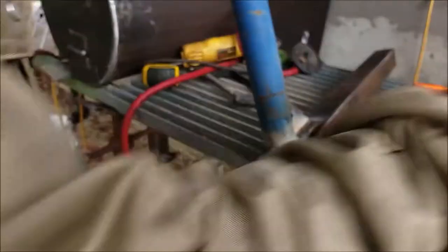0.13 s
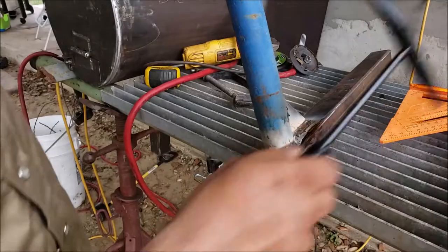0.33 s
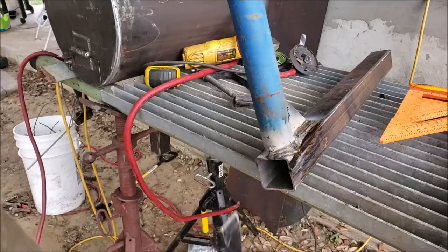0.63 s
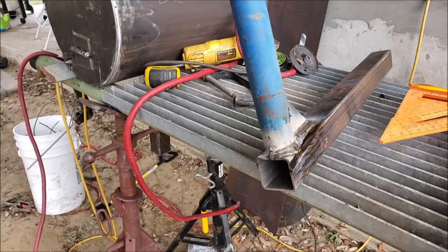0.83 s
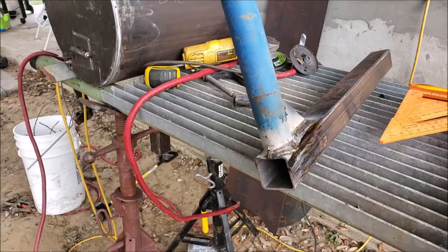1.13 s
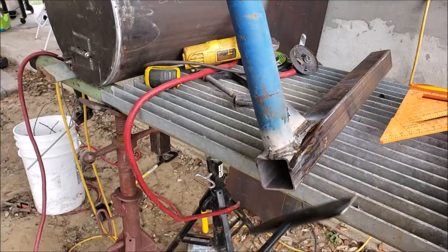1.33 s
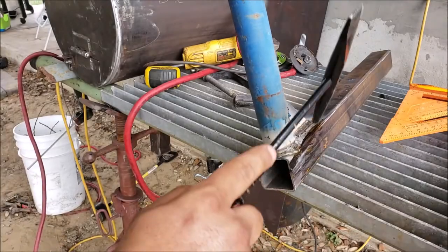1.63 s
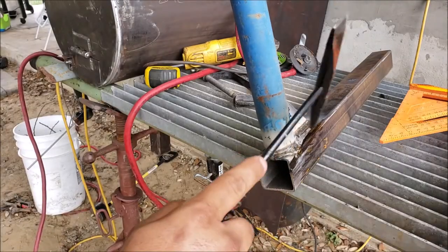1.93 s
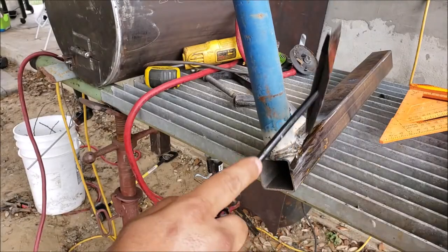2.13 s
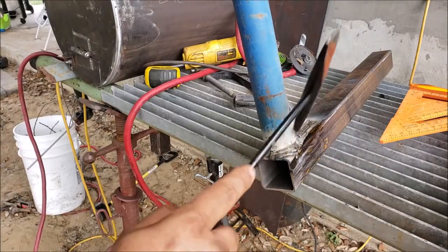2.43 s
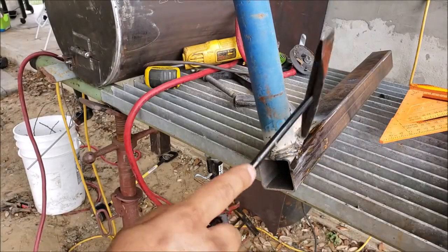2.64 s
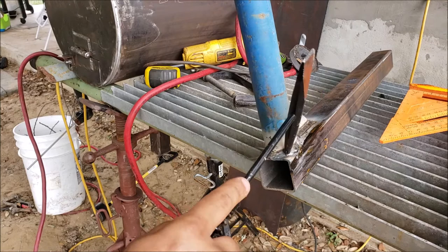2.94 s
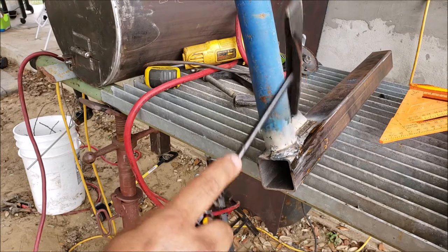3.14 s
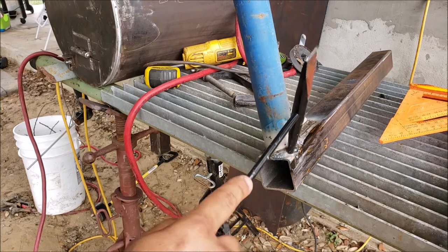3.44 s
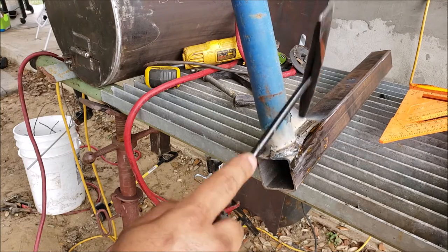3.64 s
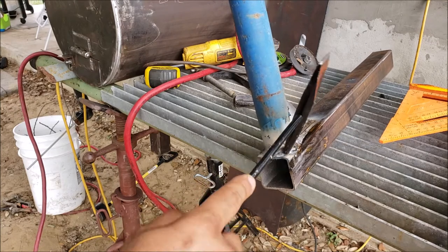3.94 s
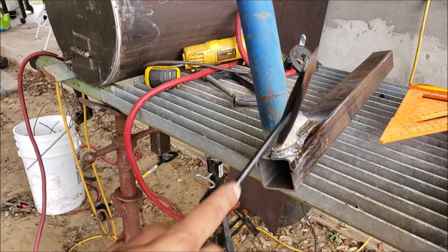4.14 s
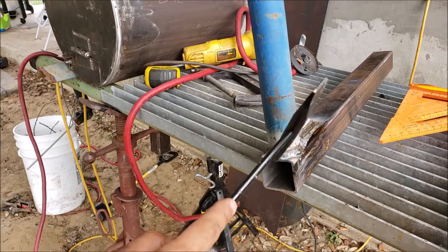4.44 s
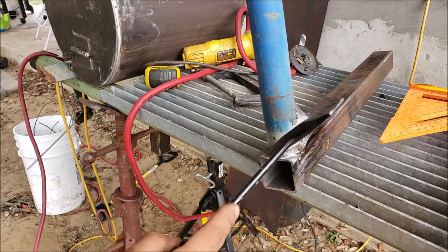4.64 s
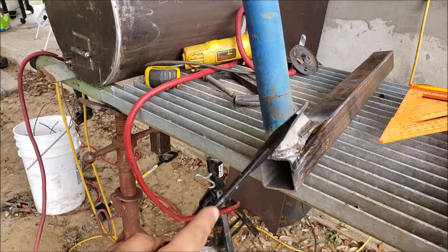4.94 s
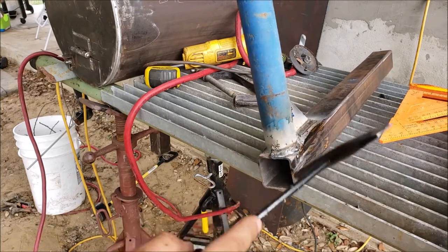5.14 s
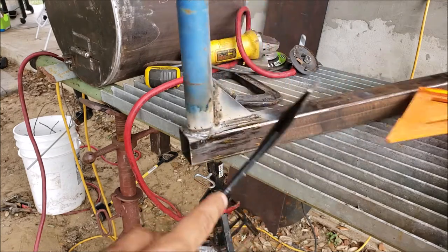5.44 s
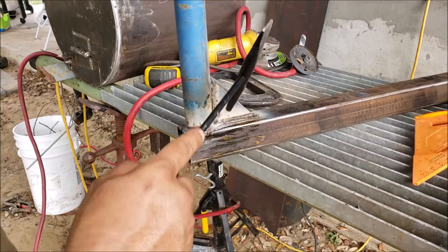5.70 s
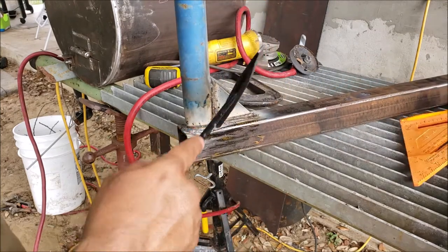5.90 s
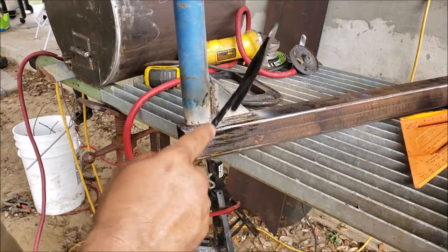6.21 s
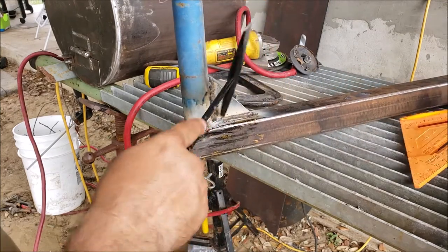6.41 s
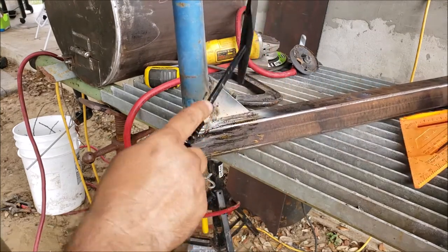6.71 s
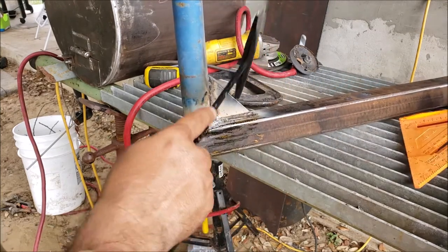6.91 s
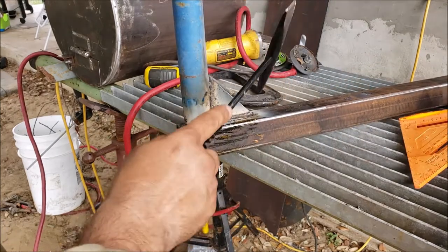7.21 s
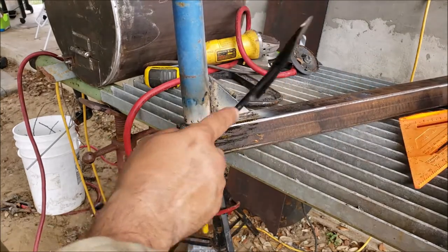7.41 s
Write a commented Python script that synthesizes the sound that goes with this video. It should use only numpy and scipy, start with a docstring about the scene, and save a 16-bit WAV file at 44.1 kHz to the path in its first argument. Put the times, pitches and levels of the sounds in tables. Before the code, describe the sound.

A low engine hum with rumble and light hiss runs in the background throughout, slowly getting quieter. A sleeve swishes faintly at about 0.2 seconds. At 1.8 seconds a chipping hammer starts knocking slag off a weld on square steel tubing, close by. It strikes fourteen times in an even rhythm, about four blows a second, until around 4.9 seconds. Each blow is a hollow knock with a bright, quickly fading metallic ring and a few tiny ticks of flying slag, varying a little in force and tone. At about 5.3 seconds the piece is dragged over a steel grating in one short scrape, landing with a ringing clatter near 5.5 seconds and rocking lightly. The hammering resumes at 5.9 seconds at the same pace, with a slightly different ring, for eight more blows, the last at about 7.6 seconds.

```python
"""On a steel grating, a chipping hammer knocks slag (the crust on a weld) off square steel tubing.
Each blow gives a hollow knock, a bright ring from the tube and a few ticks of flying slag.
Midway the piece is dragged round and set down with a clatter, and the chipping goes on.
A sleeve swishes at the start, an engine hums in the background, and a limiter flattens the hardest blows.
"""
import sys
import numpy as np
from scipy import signal
from scipy.io import wavfile
from scipy.ndimage import uniform_filter1d, minimum_filter1d

SR = 44100
rng = np.random.default_rng(int(sys.argv[2]) if len(sys.argv) > 2 else 0)


def waveform_to_disk(signal):
    """Save audio, clipped to [-1, 1], as 16-bit WAV at the path in sys.argv[1]."""
    frames = np.transpose(np.atleast_2d(signal))
    scaled = np.clip(frames, -1, 1) * 32767
    samples = np.round(scaled).astype(np.int16)
    wavfile.write(sys.argv[1], SR, samples)


N = 333396
TIME = np.arange(N) / SR
AGE = np.arange(int(0.9 * SR)) / SR  # seconds since a hit

# A hit has four strengths, low to high: knock, ring, shimmer, crack. Levels in the tables are relative.
# where they apply: knock_end_hz, ring_start_hz, ring_end_hz, shimmer_start_hz, shimmer_end_hz, crack_hz
RANGES_HZ = [2200, 2900, 4400, 5400, 7500, 9500]
# hammer blows, about four a second; the tone that swings most where the hammer lands is boosted,
# one that is still there is cut: start_s, place, force_db, brightness_db, tone_hz, boost_db
BLOWS = [(1.8094, 0, -25, 12, 4460, 2), (2.056, 0, -26, -0.5, 2830, -9), (2.289, 0, -24, 0, 6760, 10.5),
         (2.5243, 0, -29.5, -1.1, 2890, -7), (2.755, 0, -29.5, -1, 7210, 13),
         (2.9862, 0, -25, 0.1, 3000, 11), (3.236, 0, -25.5, -1.5, 4100, 4),
         (3.4634, 0, -30.5, 4, 3965, 13.5), (3.705, 0, -29, -2.5, 3700, 7),
         (3.9429, 0, -29.5, -0.1, 3170, 9), (4.1761, 1, -31, 1.7, 4410, 10.5),
         (4.405, 1, -28, 3.5, 4410, 11), (4.6436, 1, -23.5, -1, 2780, 2),
         (4.8956, 0, -32.5, -0.5, 6100, 13), (5.865, 2, -26.5, -2, 2930, -6),
         (6.1138, 3, -25, 6.5, 5900, 5.5), (6.3663, 2, -27, 2.5, 3730, 8.5),
         (6.6001, 2, -27, -.8, 3100, 4.5), (6.8379, 2, -24.5, 0.9, 6000, 10.5),
         (7.0761, 3, -24.7, -5.5, 3550, 6), (7.3134, 3, -26.7, 1.3, 4410, 5.5),
         (7.5541, 3, -25.5, -1, 3300, 7)]
# light grazes just before a blow or as the hammer skids off: start_s, place, force_db
GRAZES = [(1.838, 3, -37), (4.17, 1, -48), (4.396, 1, -46), (4.888, 1, -43)]
# places the hammer hits, each using one row of SPOTS: spot, knock_db, ring_db, shimmer_db, crack_db
PLACES = [(0, 7.5, 3, -3, -10), (0, 6, 5.5, -3.5, -11), (1, 7, 1.6, -1.6, -10.5), (2, 1, 4, 1.5, -10.5)]
# change for each dB of brightness: knock_db, ring_db, shimmer_db, crack_db
BRIGHTNESS_TILT = [-.5, -.5, .5, .5]
# how three spots on the tube answer a hit: spread_s, tube_db, wash_db
SPOTS = [(.002, 2.5, -0.5), (.003, 0, -2), (.012, 7, 3)]
# ringing tones of the tube (fade_s is the time to fall 60 dB): pitch_hz, fade_s, spot0_db, spot1_db, spot2_db
TUBE_TONES = [(1523, 0.31, -18, -28, -15), (1992, 0.45, -22, -27, -19), (2048, 0.32, -11, -21, -18),
              (2140, 0.31, -18, -17, -10), (2754, 0.29, -9, -23, -22), (2902, 0.48, -21, -15, -21),
              (3141, 0.5, -7, -12, -16), (3157, 0.54, -15, -17, -22), (3233, 0.34, -11, -5, -9),
              (3305, 0.27, -16, -12, -14), (3677, 0.18, -5, 5, 7), (3704, 0.26, -12, -7, -7),
              (3793, 0.29, -5, -14, -17), (3900, 0.35, -11, -15, -14), (4110, 0.28, -8, -11, -16),
              (4250, 0.27, -8, -11, -3), (4296, 0.29, -18, -20, -15), (4409, 0.24, -6, -14, 1),
              (4560, 0.27, -9, -5, -4), (4877, 0.27, -12, -3, -13), (5211, 0.23, -8, -9, -7),
              (5243, 0.27, -7, -8, -5), (5478, 0.23, -9, -11, -3), (5550, 0.29, -10, -8, -3),
              (5652, 0.23, -7, -9, -2), (5817, 0.22, -9, -4, -2), (5962, 0.26, -8, -7, -10),
              (6054, 0.31, -11, -8, -4), (6751, 0.31, -12, -19, -21), (7041, 0.26, -16, -13, -19)]
# short tones of the hollow knock: pitch_hz, fade_s, spot0_db, spot1_db, spot2_db
KNOCK_TONES = [(706, 0.093, -7, -6.5, -7), (778, 0.1, 3.5, -5.5, -20), (956, 0.0094, 10, 4, 0),
               (1539, 0.07, 3, 6, 6), (2060, 0.0078, 4.5, 9, 5), (1997, 0.042, 9.5, 13, 8),
               (2264, 0.0089, 16, 11, 9), (2870, 0.069, 3.5, -1.5, -2), (3150, 0.1, 4.5, -1.5, 8),
               (3936, 0.14, -5.5, -10, -18), (4410, 0.081, 1, -9, -7)]
# drive of the upper knock tones above the ring strength: spot0_db, spot1_db, spot2_db
UPPER_KNOCK_DB = [6.5, 8, 0]
# the hammer's own long ring: pitch_hz, fade_s, spot0_db, spot1_db, spot2_db
HAMMER_TONES = [(908, 0.84, -27, -51, -38), (2095, 0.45, -38.5, -14.5, -14), (3187, 0.97, -16.5, -24, -15)]
# tones of the grating: pitch_hz, fade_s, level_db
GRATING_TONES = [(311, 0.23, -22), (410, 0.091, -10), (725.5, 0.14, 2), (766.7, 0.14, 6), (920, 0.034, -16),
                 (1210, .14, -1.5), (1980, 1, -21.5), (2402, 0.12, 0), (2620, 0.19, -24)]
# how much of a knock passes into the grating: spot0_db, spot1_db, spot2_db
GRATING_SHARE_DB = [-17, -13, -13]
# countless weak tones and echoes that blur into a wash of noise: pitch_hz, level_db, fade_s
WASH = [(204, -20, 0.25), (448, -5.5, 0.21), (820, -7.5, 0.27), (1160, -18.5, 0.5), (1740, -6, 0.4),
        (3300, 0.5, 0.3), (3700, 6.5, 0.27), (7080, 6, 0.23), (8200, -15, 0.11), (11900, 12.5, 0.29),
        (15300, -31.5, 0.15)]
# first crack of steel on slag: pitch_hz, level_db, fade_s
CRACK = [(300, -7, 0.053), (1000, -6.5, 0.049), (2210, 1, 0.019), (4150, 2, 0.12), (8370, 4.5, 0.0056),
         (14900, 4.5, 0.088)]
# how alike the steel sounds on the left and right: pitch_hz, likeness
RING_LIKENESS = [(200, 1), (800, 0.27), (1500, -0.48), (2500, -0.13), (5000, -0.29), (14000, 0.22)]
# which side the steel is louder on: pitch_hz, left_minus_right_db
RING_PAN = [(300, 9.5), (700, -4.5), (1400, -1.5), (2800, 3), (5000, -0.5), (9000, -2.5), (14000, -2.5)]
# an edge touches the grating as the piece is lifted, lowered and rocks: start_s, force_db, thud_db
TOUCHES = [(5.2745, -47.5, 5.5), (5.4415, -33, 7.5), (5.5583, -32.5, -5.5), (5.617, -42.5, 6.5),
           (5.763, -53.5, 6)]
# tone colour of the scrape: pitch_hz, level_db
DRAG_COLOUR = [(120, -44), (200, -16), (390, -3), (494, -7.5), (849, -11.5), (1020, -15), (2090, -5.5),
               (2650, -11.5), (3730, -6), (7020, -23.5), (15000, -31)]
# a sleeve brushes past: time_s, level_db, pitch_hz
SLEEVE = [(.1, -85, 4500), (.2, -51, 4310), (0.291, -50, 3420), (.38, -85, 3200)]
# tones of the engine: multiple_of_shaft_rate, level_db
ENGINE_TONES = [(2, -0.5), (3, -13.5), (4, -13), (5, -22), (6, -19.5), (7, -34), (8, -26), (9, -26),
                (10, -34), (11, -32.5), (12, -33.5), (13, -46)]
# loudness of the engine and background noise together: time_s, level_db
BACKGROUND_LEVEL = [(0.15, -29), (1.38, -29), (1.66, -27.5), (2.32, -31), (6.07, -31.5), (6.15, -33.5),
                    (6.19, -34.5), (7.5, -37)]
# tone colour of the background noise: pitch_hz, level_db
AIR_COLOUR = [(15, -37), (25, -12), (70, -0.5), (223, -19), (270, -27.5), (326, -34), (575, -30),
              (863, -30), (1330, -38), (2410, -35.5), (4370, -42), (6380, -39), (8830, -53), (14800, -46.5),
              (16000, -61)]
# how alike that noise is on the left and right: pitch_hz, likeness
AIR_LIKENESS = [(60, 0.15), (150, 0.91), (300, 0.45), (700, 0.16), (2000, 0.036), (10000, 0.026)]


def struck_steel():
    """Hammer blows and drops on the grating both set the welded tube ringing."""
    out = np.zeros((2, N))
    tube, knock = tones(TUBE_TONES), tones(KNOCK_TONES)
    hammer, grating = tones(HAMMER_TONES), tones(GRATING_TONES)
    band_hz, wash = fading_noise(WASH)
    _, crack = fading_noise(CRACK)
    wall_hz, walls = wall_overtones()
    tube_hz, _, *tube_spots = np.transpose(TUBE_TONES)
    knock_hz, _, *knock_spots = np.transpose(KNOCK_TONES)
    _, _, *hammer_spots = np.transpose(HAMMER_TONES)
    _, _, grating_db = np.transpose(GRATING_TONES)

    def ringing(hit, tones_db, wash_db, spread_s):
        """The crack comes at once; the ring swells as the hit spreads through the steel."""
        clear = excite(tube, tones_db + strength(hit, tube_hz))
        clear += excite(walls, strength(hit, wall_hz) - 21, scatter_db=3.5)
        blur = excite(wash, strength(hit, band_hz, focus=0.96) + wash_db, scatter_db=1)
        snap = excite(crack, strength(hit, band_hz) + 2.5)
        swell = 1 - np.exp(-AGE / spread_s)
        ring = swell * (clear + crumble(blur, share=0.66, length_s=0.0033))
        return ring + crumble(snap, share=0.75, length_s=0.0071)

    for start_s, spot, hit in hammer_blows():
        knock_db, ring_db, _, crack_db = hit[:4]
        spread_s, tube_db, wash_db = SPOTS[spot]
        drive_db = np.where(knock_hz < RANGES_HZ[0], knock_db, ring_db + UPPER_KNOCK_DB[spot])
        thud = excite(knock, knock_spots[spot] + drive_db + 1, scatter_db=1)
        head = excite(hammer, hammer_spots[spot] + knock_db)
        bars = excite(grating, grating_db + knock_db + GRATING_SHARE_DB[spot])
        body = ringing(hit, tube_spots[spot] + tube_db, wash_db, spread_s)
        thud = crumble(thud, share=0.3, length_s=0.012)
        chips = from_db(crack_db + 6) * slag_chips()
        add(out, start_s, body + bars + thud + head + chips)
    for start_s, damping_db_per_s, levels_db, thud_db in drops():
        levels_db[0] += thud_db  # the weight of the piece adds to the knock alone
        clang = excite(grating, grating_db + levels_db[0])
        hit = [*levels_db, 0, 0]  # a broad contact boosts no single tone
        body = ringing(hit, np.mean(tube_spots, 0) + 7.5, wash_db=6, spread_s=0.0011)
        add(out, start_s, (body + clang) * from_db(-damping_db_per_s * AGE))
    return out


def hammer_blows():
    """Place, force and brightness set the four strengths of each blow or graze."""
    grazes = [(*graze, 0, 0, 0) for graze in GRAZES]
    for start_s, place, force_db, brightness_db, tone_hz, boost_db in BLOWS + grazes:
        spot, *colour_db = PLACES[place]
        levels_db = force_db + np.array(colour_db) + brightness_db * np.array(BRIGHTNESS_TILT)
        yield start_s, spot, [*levels_db, tone_hz, boost_db]


def strength(hit, hz, focus=1):
    """How hard a hit drives each pitch, in dB, with a boost or cut around one tone."""
    knock, ring, shimmer, crack, tone_hz, boost_db = hit
    broad_db = np.interp(np.log(hz), np.log(RANGES_HZ), [knock, ring, ring, shimmer, shimmer, crack])
    return broad_db + focus * boost_db * np.exp(-(focus * (hz - tone_hz) / 170) ** 2)


def excite(parts, db, scatter_db=1.5):
    """Add up tones or noise bands, each driven a little differently every time."""
    return np.tensordot(from_db(db + scatter_db * rng.standard_normal(len(parts))), parts, 1)


def tones(table, lag_s=0.0002, attack_s=0.00059):
    """Struck steel rings as fading sine waves; shorter waves are more out of step left and right."""
    rings = []
    for hz, fade_s, *_ in table:
        apart = min(np.pi * hz * lag_s, np.pi / 2) * rng.choice([-1, 1])
        phase = rng.uniform(0, 2 * np.pi) + apart * np.array([[.5], [-.5]])
        rings.append(np.sin(2 * np.pi * hz * AGE + phase) * from_db(-60 * AGE / fade_s) * panned(hz))
    return np.array(rings) * (1 - np.exp(-AGE / attack_s))


def wall_overtones(count=110, fade_s=0.25):
    """The thin tube walls have many high tones of uneven strength."""
    pitches_hz = rng.uniform(4500, 15500, count)
    gains = from_db(4 * rng.standard_normal(count))
    return pitches_hz, tones([(hz, fade_s) for hz in pitches_hz]) * gains[:, None, None]


def fading_noise(table):
    """Bands of noise, each dying away at its own rate."""
    band_hz, bands = noise_bands(150, RING_LIKENESS, size=len(AGE), count=24)
    fades = [from_db(db - 60 * AGE / fade_s) * panned(hz)
             for hz, db, fade_s in zip(band_hz, *at_hz(table, band_hz))]
    return band_hz, bands * fades


def crumble(sound, share, length_s):
    """A contact is one clean impact followed by a short spray of tiny ones."""
    age = AGE[:SR // 20]
    spikes = rng.standard_normal(len(age)) ** 3 * np.exp(-age / length_s)
    spray = unit_level(spikes) / np.sqrt(len(age))
    force = share * spray + (age == 0)
    return signal.fftconvolve(sound, force[None] / np.hypot(1, share))[:, :len(AGE)]


def slag_chips(flight_s=0.054, lowest_hz=6000, count=5):
    """A few flakes of slag fly off and tick against the steel."""
    impacts = np.zeros((2, len(AGE)))
    at = np.minimum(rng.exponential(flight_s, count) * SR, len(AGE) - 1).astype(int)
    impacts[:, at] = rng.standard_normal((2, count)) * np.exp(-AGE[at] / (2 * flight_s))
    tick = rng.standard_normal(SR // 200) * np.exp(-AGE[:SR // 200] / .0007)
    ticks = signal.fftconvolve(impacts, tick[None])[:, :len(AGE)]
    return filtered(ticks, lowest_hz, "high")


LANDING_S = 5.4572  # the drag ends and the piece lands flat


def drops(gap_s=0.012, landing_db=-28.6, loss_db=13):
    """The piece chatters as it lands, each bounce weaker and shorter, with light touches around it."""
    landing_colour_db = np.array([-1, 2, -1, -2.5])  # knock, ring, shimmer, crack
    touch_colour_db = np.array([-2, 2.5, 0.5, -6.5])
    # each contact: start_s, damping_db_per_s, levels_db, thud_db
    for bounce in range(3):
        levels_db = landing_db - bounce * loss_db + landing_colour_db
        yield LANDING_S + bounce * gap_s, 90 * bounce, levels_db, 11.5 - 5 * bounce
    for start_s, force_db, thud_db in TOUCHES:
        yield start_s, 548, force_db + touch_colour_db, thud_db


def drag(start_s=5.272, peak_s=5.347, rise_db_per_s=165, fall_db_per_s=162, grit_db=2.5):
    """Steel catches and slips over the grating in one push that swells and dies away."""
    band_hz, bands = noise_bands(200, RING_LIKENESS, size=SR // 2, count=20)
    scrape = np.zeros((2, N))
    add(scrape, 5.2, unit_level(excite(bands, at_hz(DRAG_COLOUR, band_hz))))
    below_peak_db = np.maximum((peak_s - TIME) * rise_db_per_s, (TIME - peak_s) * fall_db_per_s)
    push = from_db(-23 - below_peak_db) * (TIME > start_s) * (TIME < LANDING_S)
    return scrape * push * from_db(grit_db * drift(rate_hz=350))


def sleeve(width_hz=380):
    """A faint swish of cloth that falls in pitch as the arm slows."""
    time_s, level_db, pitch_hz = np.transpose(SLEEVE)
    rustle = filtered(rng.standard_normal((2, N)), width_hz, "low")
    glide = np.sin(2 * np.pi * np.cumsum(np.interp(TIME, time_s, pitch_hz)) / SR)
    loudness = from_db(np.interp(TIME, time_s, level_db)) * (TIME < time_s[-1])
    return unit_level(rustle * glide) * loudness


def engine(shaft_hz=30.6, waver_rad=0.089, flutter=0.28):
    """A hum at multiples of the shaft's turning rate; the firing tone is steady, weaker ones flutter."""
    angle = 2 * np.pi * shaft_hz * TIME + waver_rad * drift(rate_hz=3)
    hum = np.zeros(N)
    for multiple, db in ENGINE_TONES:
        gain = from_db(db) * (1 + flutter * (db < -6) * drift(rate_hz=7))
        hum += gain * np.sin(multiple * angle + rng.uniform(0, 2 * np.pi))
    return from_db(-0.34) * np.sqrt(2) * hum


def air():
    """Deep throb, rumble and hiss that go with the hum."""
    band_hz, bands = noise_bands(20, AIR_LIKENESS, size=N, count=22)
    bands *= from_db(at_hz(AIR_COLOUR, band_hz))[:, None, None]
    throb = unit_level(bands[band_hz < 50].sum(0))
    rumble = unit_level(bands[(band_hz > 85) & (band_hz < 260)].sum(0))
    hiss = unit_level(bands[band_hz >= 260].sum(0))
    return from_db(-21) * throb + from_db(-15) * rumble + from_db(-14) * hiss


def noise_bands(lowest_hz, likeness, size, count):
    """Stereo noise split into bands: their middle pitches and their sounds."""
    edges_hz = np.geomspace(lowest_hz, 17000, count + 1)
    band_hz = np.sqrt(edges_hz[1:] * edges_hz[:-1])
    white = rng.standard_normal((2, 2, size))
    bands = []
    for k, hz in enumerate(band_hz):
        shared, opposite = filtered(white[k % 2], edges_hz[k:k + 2], "band")
        alike = np.clip(at_hz(likeness, hz), -1, 1)
        bands.append(np.sqrt(1 + alike) * shared + np.sqrt(1 - alike) * opposite * [[1], [-1]])
    return band_hz, 2 * np.array(bands)


def filtered(sound, hz, kind):
    """Keep the lows, the highs or one band."""
    return signal.sosfilt(signal.butter(2, hz, kind, fs=SR, output="sos"), sound)


def panned(hz):
    """Left and right gain of the ringing steel at one pitch."""
    return from_db(at_hz(RING_PAN, hz) * np.array([[.5], [-.5]]))


def at_hz(table, hz):
    """Read a table's columns at the given pitch."""
    pitch_hz, *columns = np.transpose(table)
    return np.squeeze([np.interp(np.log(hz), np.log(pitch_hz), column) for column in columns])


def drift(rate_hz):
    """A curve that wanders at random around zero."""
    points = rng.standard_normal(int(N / SR * rate_hz) + 2)
    return np.interp(TIME * rate_hz, np.arange(len(points)), points)


def from_db(db):
    """Turn decibels into a gain."""
    return 10 ** (np.asarray(db) / 20)


def unit_level(sound):
    """Scale a sound to an average power of one."""
    return sound / np.sqrt(np.mean(sound ** 2) + 1e-20)


def add(out, start_s, sound):
    """Mix a sound in at its start time."""
    at = int(start_s * SR)
    out[:, at:at + sound.shape[1]] += sound[:, :max(N - at, 0)]


def scene():
    """Steelwork close by, over a background that slowly gets quieter."""
    background_gain = from_db(0.5 + np.interp(TIME, *np.transpose(BACKGROUND_LEVEL)))
    return struck_steel() + drag() + sleeve() + background_gain * (engine() + air())


def limiter(sound, ceiling_db=-0.3, release_db_per_s=253):
    """The volume drops just ahead of a loud peak and comes back quickly."""
    over_db = np.maximum(20 * np.log10(np.abs(sound).max(0) + 1e-9) - ceiling_db, 0)
    recovery_db = release_db_per_s * TIME
    cut_db = np.maximum.accumulate(over_db + recovery_db) - recovery_db
    return sound * from_db(uniform_filter1d(minimum_filter1d(-cut_db, size=45), size=45))


def record(dry, cutoff_hz=15600):
    """Hold down the peaks and cut the highest treble."""
    return signal.sosfilt(signal.ellip(10, .2, 80, cutoff_hz, fs=SR, output="sos"), limiter(dry))


dry = scene()
out = record(dry)
waveform_to_disk(out)
```